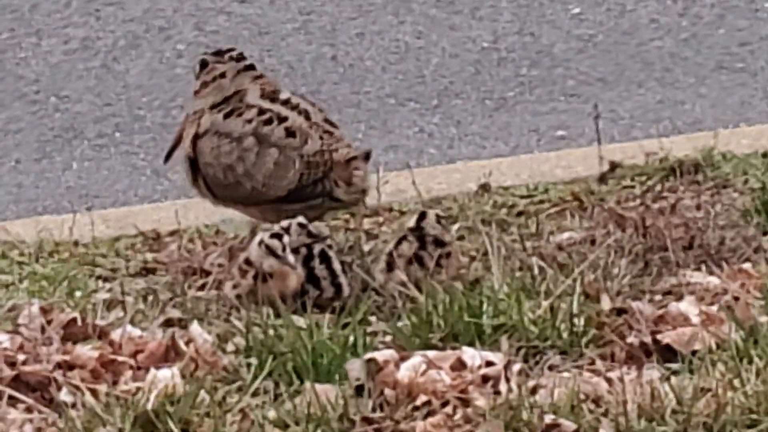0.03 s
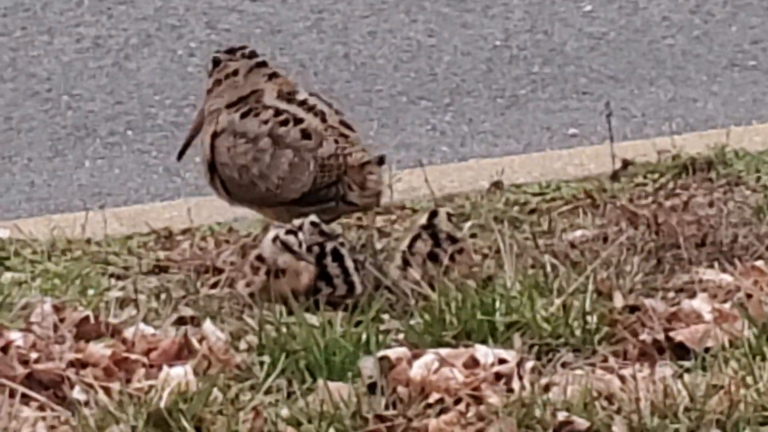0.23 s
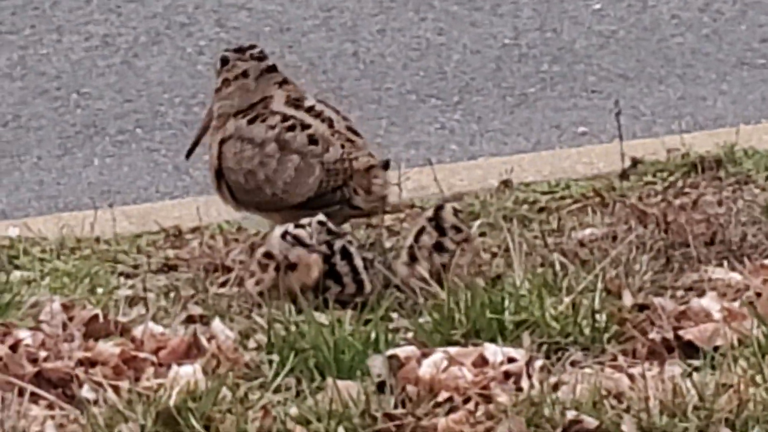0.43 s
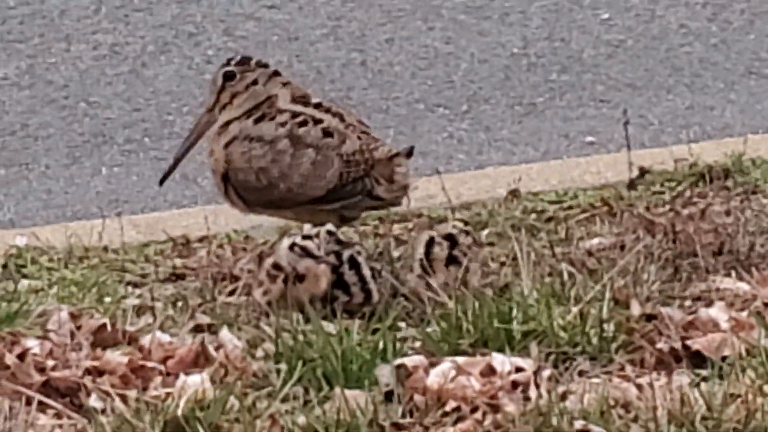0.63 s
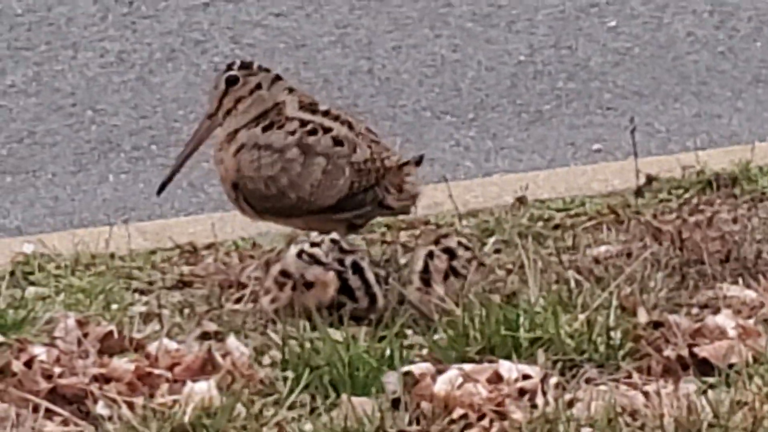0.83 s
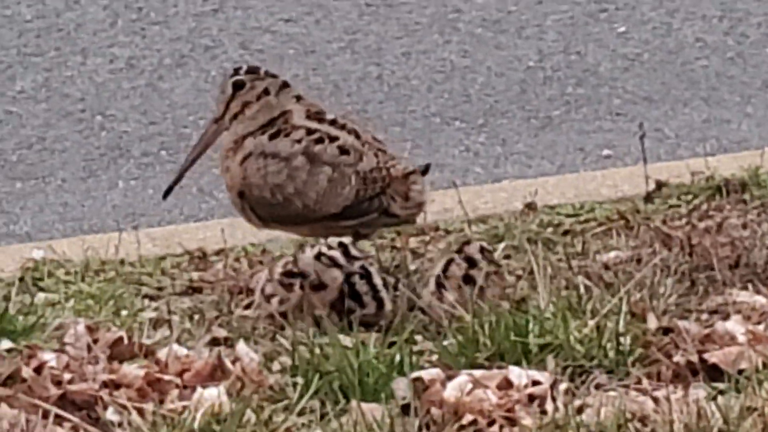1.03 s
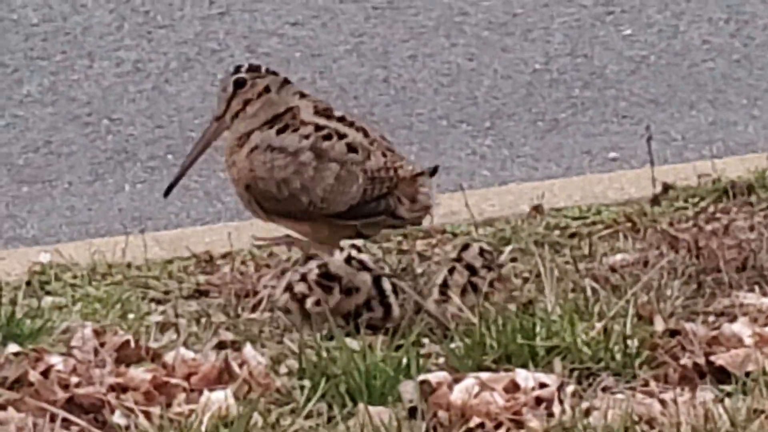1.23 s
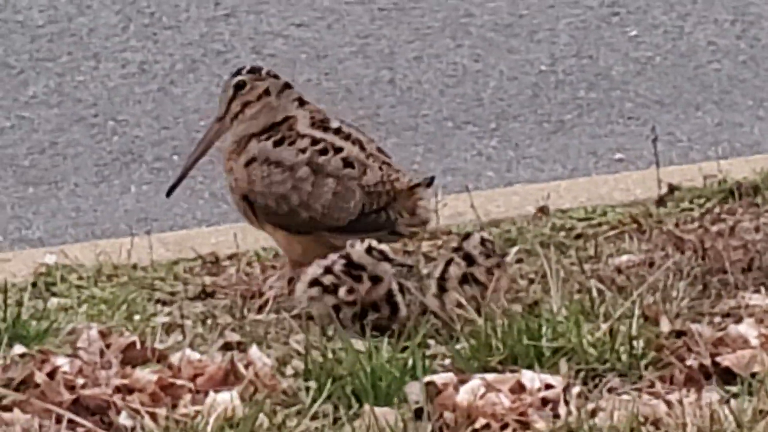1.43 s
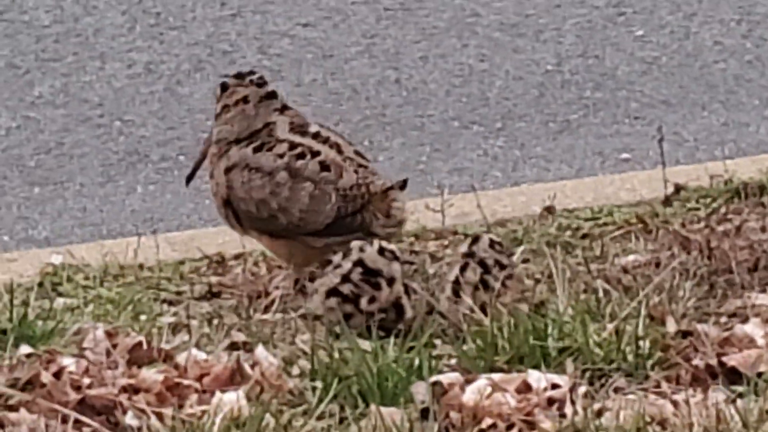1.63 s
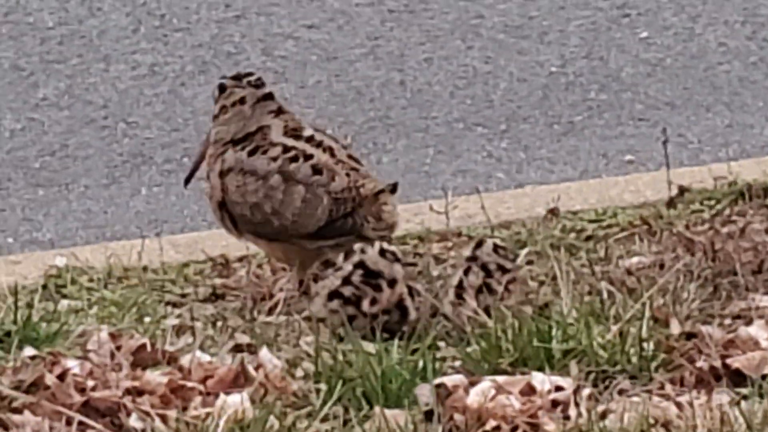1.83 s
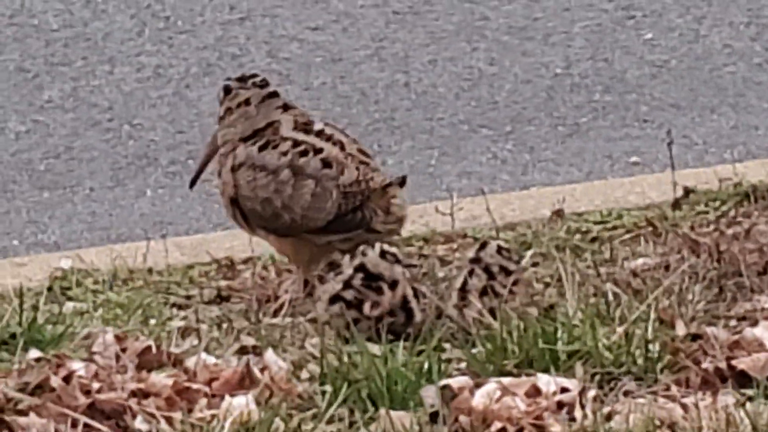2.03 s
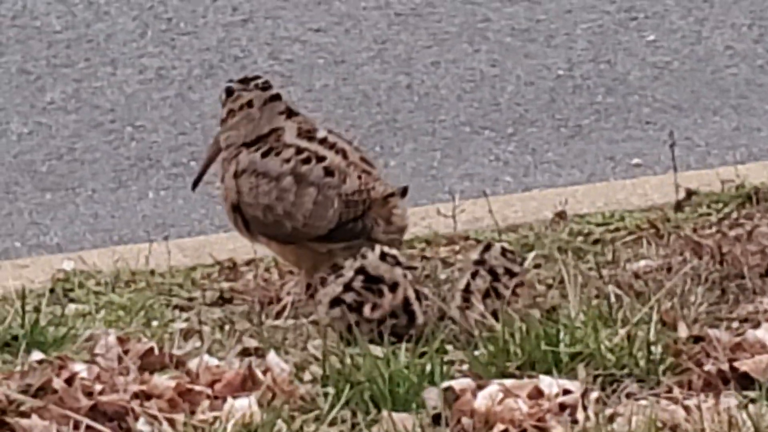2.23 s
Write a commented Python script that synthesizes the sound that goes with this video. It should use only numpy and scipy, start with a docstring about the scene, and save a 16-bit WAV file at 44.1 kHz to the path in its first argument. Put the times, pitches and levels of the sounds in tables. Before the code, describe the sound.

Thin, high peeps from woodcock chicks overlap and slide downward during the first 0.6 seconds. Dry leaves rustle briefly around 0.5 seconds. From 0.7 to 0.9 seconds a bird gives four quick, soft nasal notes. Wind thumps the microphone, mostly on the left, strongest from 0.3 to 1.1 seconds, then eases. Faint stalk crackles, grass hiss and steady distant traffic continue to the end at about 2.3 seconds.

```python
"""A grassy roadside with a woodcock and her chicks. Thin, high peeps slide downward and overlap,
and a bird adds four soft nasal notes, shaped by its throat. The calls echo off trees and ground.
A gust thumps mostly on the left microphone opening and stirs dry leaves and stalks.
Behind it all, grass hisses and distant traffic rushes steadily."""
import sys
import numpy as np
from scipy import signal
from scipy.fft import rfft, irfft, next_fast_len
from scipy.io import wavfile
from scipy.ndimage import uniform_filter1d, map_coordinates

SR = 44100
rng = np.random.default_rng(int(sys.argv[2]) if len(sys.argv) > 2 else 0)


def wav_out(sig):
    """Save sig, one row per channel (or a flat mono array), as 16-bit PCM at SR to the path in sys.argv[1]."""
    wavfile.write(sys.argv[1], SR, np.round(np.clip(np.atleast_2d(sig).T, -1, 1) * 32767).astype(np.int16))


N = 101429

# The near peep. Each row: time in seconds, pitch in Hz, level in dB, pan in dB (plus is left).
NEAR_PEEP = [(.174, 6230, -67, -1), (.194, 7290, -63, -6), (.212, 7600, -57.5, -12), (.252, 7200, -61, -12),
             (.29, 7170, -67, -15), (.35, 6920, -68, 8), (.39, 6670, -59, 13), (.418, 6840, -66, 9),
             (.46, 6710, -59, 10), (.49, 6500, -70, 1), (.525, 6460, -67, 3), (.568, 6530, -64, -1),
             (.596, 6080, -77, -7)]
# Farther peeps, one list each. Each row: time in seconds, pitch in Hz, level in dB.
DISTANT_PEEPS = [
    [(0, 6660, -76), (.11, 6390, -75), (.18, 6330, -75), (.225, 6070, -75), (.248, 5600, -80)],
    [(.298, 5710, -77), (.325, 6750, -72), (.345, 6840, -70), (.41, 6570, -67.5), (.48, 6270, -67),
     (.52, 6210, -66), (.567, 6220, -66), (.604, 5760, -74)],
]
# Nasal notes, one list each. Each row: time in seconds, pitch in Hz, level in dB.
NASAL_NOTES = [
    [(.715, 476.7, -60), (.727, 505, -49.5), (.738, 513, -47.5), (.745, 460, -53.5), (.757, 450, -57)],
    [(.753, 449.5, -58), (.771, 448.6, -52), (.791, 434, -63)],
    [(.799, 444, -63), (.813, 461.5, -52.5), (.822, 464, -63), (.836, 463, -56)],
    [(.855, 494.5, -56), (.867, 464, -51), (.876, 456, -53), (.89, 430, -65)],
]
# Swirls of air. Each row: middle in seconds, strength in dB, pitch in Hz, pan in dB.
WIND_EDDIES = [(.008, -31, 60, 31), (.089, -24, 52, 29), (0.163, -27.5, 52, 18), (0.244, -26, 63.3, 26),
               (0.342, -12.5, 71.5, 38), (0.388, -26.5, 62, 21), (0.433, -22, 66.4, 19),
               (.486, -23.5, 63, -31), (0.531, -23, 59.1, 24), (.558, -28.5, 195, 30), (0.572, -13, 76, 32),
               (0.619, -19.5, 76, 24), (0.664, -17.5, 65, 20), (.698, -17, 60, 10), (.733, -16.5, 85, 27),
               (.762, -17.5, 83, 26), (0.871, -18, 92, 28), (0.894, -22, 64.5, 24), (.974, -21, 89.4, 26),
               (1.0, -24, 75, 24), (1.05, -41, 70, 2), (1.097, -24, 61.6, 27), (1.191, -37, 69, 12),
               (1.455, -30, 71, 18), (1.683, -38.5, 81, 1)]
# Brushes through dry leaves. Each row: start in seconds, level in dB, seconds to fade by 60 dB.
LEAF_BRUSHES = [(0.44, -46.5, 0.36), (.5, -63.5, 0.77), (1.546, -65, .2)]
# Stalk crinkles. Each row: start in seconds, level in dB, pan in dB, seconds to fade by 60 dB.
CRINKLES = [(.615, -61, 3, .03), (.675, -57, -2, .04), (.778, -53.5, -3, 0.015), (1.108, -63.5, 2, .09),
            (1.32, -66, 0, 0.18), (1.48, -58, -3, 0.023), (1.548, -58.5, 0, 0.089), (1.968, -68, 0, 0.14),
            (2.272, -63, -2, 0.077)]

# How each noise swells and sinks. Each row: time in seconds, base level in dB.
WIND_SWELL = [(0, -43), (.2, -43), (.4, -39), (.6, -35), (.72, -34.5), (.82, -39), (1.0, -41.5),
              (1.15, -45.5), (1.3, -54), (1.6, -51), (1.9, -59), (2.1, -61.5), (2.3, -50)]
GRASS_SWELL = [(0, -56.5), (.06, -72), (.19, -62), (.25, -65), (.42, -62), (.65, -61), (.86, -59.5),
               (1.03, -62.5), (1.33, -63), (1.42, -63), (1.58, -62), (1.75, -62.5), (1.98, -61),
               (2.15, -63), (2.3, -62)]
TRAFFIC_SWELL = [(0, -49), (.25, -49.5), (.45, -46), (.7, -48), (.9, -47), (1.15, -50), (1.6, -50.5),
                 (1.8, -51), (2.3, -49.5)]
# The tone colour of each source. Each row: frequency in Hz, relative strength in dB.
THROAT_COLOUR = [(500, -36), (1000, -9), (1400, 0.5), (1650, -6), (1950, 5), (2350, -7.5), (2700, -5),
                 (3150, 1.5), (3600, -2.5), (4100, -13.5), (4700, -16), (5300, -27), (6300, -10),
                 (7200, -25), (9000, -38), (14000, -60)]
WIND_COLOUR = [(20, -17), (32, -9.5), (48, -2), (70, -2.5), (100, -7.5), (140, -11.5), (220, -20),
               (350, -37.5), (800, -38), (3000, -67.5)]
LEAF_COLOUR = [(300, -1), (700, 2), (1400, 5.5), (2100, -0.5), (2800, 6), (3500, -1.5), (4800, -8),
               (5800, -7), (8200, -12.5), (11000, -27), (14000, -18), (16000, -19)]
STALK_COLOUR = [(1000, -12), (4000, 0.5), (7000, 6.5), (11000, -2.5), (16000, -3)]
GRASS_COLOUR = [(500, -19), (2000, 9.5), (3300, 6), (5200, 1.5), (6300, 5), (7100, 5.5), (7800, -2),
                (9500, -5), (15500, -6)]
TRAFFIC_COLOUR = [(18, -35), (30, -4.5), (71, -0.5), (97, -6), (133, -13), (177, -13), (277, -16),
                  (350, -16), (379, -16.5), (492, -16), (728, -17.5), (787, -22), (1360, -19.5),
                  (2830, -37), (6890, -34), (15500, -38)]
# How air and microphone dull the traffic. Each row: frequency in Hz, gain in dB.
TRAFFIC_DULLING = [(50, 1.5), (130, 2), (300, 1), (1500, 3), (3000, 1.5), (6000, -9.5), (12000, -24)]
# How alike left and right are. Each row: frequency in Hz, likeness from 0 (unrelated) to 1 (same).
GRASS_LIKENESS = [(2000, 0.14), (6000, 0), (10000, 0)]
TRAFFIC_LIKENESS = [(60, 0.94), (280, 1), (600, 0.41), (1200, .05), (2500, 0.006), (5000, 0.022),
                    (12000, 0)]
# Which side is louder. Each row: frequency in Hz, pan in dB.
GRASS_BALANCE = [(3000, -1.5), (5000, 0.5), (6800, 2.5), (9000, -3.5), (14000, 2)]
TRAFFIC_BALANCE = [(100, 1.5), (500, 0), (1300, 3.5), (2500, 1.5), (4500, 2.5), (6500, 5), (10000, 6)]


def peep(rows, waver_hz=14, flutter_db=1, octave_db=-32):
    """A nearly pure whistle that wavers slightly in pitch and loudness."""
    hz, db = curves(rows)[:2]
    pitch = uniform_filter1d(hz, size=500) + waver_hz * wobble(129.8)
    phase = 2 * np.pi * np.cumsum(pitch) / SR
    tone = np.sin(phase) + amp(octave_db) * np.sin(2 * phase)
    return np.sqrt(2) * gate(rows) * amp(db + flutter_db * wobble(68)) * tone


def peeps(far_pan_db=-3, far_echo_db=-5):
    """One near whistle, and two farther ones to the right with extra echo."""
    far = sum(peep(rows) for rows in DISTANT_PEEPS) * panned(far_pan_db)
    near_pan_db = curves(NEAR_PEEP)[2]
    return peep(NEAR_PEEP) * panned(near_pan_db) + far + amp(far_echo_db) * echo(far)


def nasal_notes(pitch_jitter=0.0072, roughness=0.25):
    """A stack of overtones shaped by the bird's throat, with a puff of noise on each vibration."""
    out = np.zeros(N)
    harmonics = np.arange(1, 21)[:, None]
    rasp = noise(THROAT_COLOUR)[0]
    for rows in NASAL_NOTES:
        hz, db = curves(rows)
        loudness = gate(rows) * amp(db)
        on = loudness > 0
        hz = (hz * (1 + pitch_jitter * wobble(300)))[on]
        phase = 2 * np.pi * np.cumsum(hz) / SR
        offsets = rng.uniform(0, np.pi, harmonics.shape)
        strengths = amp(along(THROAT_COLOUR, harmonics * hz))
        tone = np.sum(strengths * np.sin(harmonics * phase + offsets), axis=0)
        puffs = roughness * rasp[on] * (1 + np.cos(phase))
        out[on] += loudness[on] * (unit(tone) + puffs)
    return out * panned(db=6.5)


def wind(uneven_db=3.5, sheltered_right_db=-10.5, width_cycles=0.62, rise_to_fall=0.66):
    """Air rumbles on the microphone openings, and single swirls thump for a cycle or two."""
    level_db, = curves(WIND_SWELL)
    lumps_db = uneven_db * np.array([wobble(17.94), wobble(18.9)])
    out = noise(WIND_COLOUR) * amp(level_db + lumps_db) * amp([[0], [sheltered_right_db]])
    for middle, db, hz, pan in WIND_EDDIES:
        cycles = (clock() - middle) * hz
        width = width_cycles * np.where(cycles < 0, rise_to_fall, 1)
        swell = amp(db) * np.exp(-.5 * (cycles / width) ** 2)
        out += swell * np.sin(2 * np.pi * cycles) * panned(pan) / np.sqrt(2)
    return out


def leaves(grain_db=0.5):
    """Dry leaves brush together: grainy noise that swells quickly, holds and dies away."""
    loudness = sum(burst(start, db, fade_s, rise_s=0.0097, fade_after_s=0.017)
                   for start, db, fade_s in LEAF_BRUSHES)
    return loudness * unit(noise(LEAF_COLOUR) * amp(grain_db * wobble(500)))


def stalks(crackles_per_s=60, faintest_db=-73, crackle_fade_s=0.0091, rise_share=.08):
    """Dry stalks give many faint, random crackles and a few soft crinkles."""
    clicks = np.zeros((2, N))
    for when, size, side in rng.random((int(crackles_per_s * N / SR), 3)):
        sample = min(int(when * N), N - 1)
        clicks[:, sample] += amp(faintest_db + 8 * size) * panned(8 * (side - .5))[:, 0]
    decay = amp(-60 * clock()[:SR // 10] / crackle_fade_s)
    loudness = signal.fftconvolve(clicks, decay[None], axes=1)[:, :N]
    for start, db, pan, fade_s in CRINKLES:
        rise_s = rise_share * fade_s
        loudness += burst(start, db, fade_s, rise_s, fade_after_s=rise_s) * panned(pan)
    return loudness * noise(STALK_COLOUR)


def grass():
    """A fine hiss of grass that swells with the breeze."""
    level_db, = curves(GRASS_SWELL)
    hiss = rush(GRASS_COLOUR, GRASS_LIKENESS, GRASS_BALANCE)
    return hiss * amp(level_db + 0.35 * wobble(24.95) + 0.98 * wobble(400))


def traffic():
    """The wide rush of far roads, dulled by the air and the microphone."""
    level_db, = curves(TRAFFIC_SWELL)
    roads = rush(TRAFFIC_COLOUR, TRAFFIC_LIKENESS, TRAFFIC_BALANCE)
    dulled = filtered(roads, lambda hz: amp(along(TRAFFIC_DULLING, hz)))
    return dulled * amp(level_db + 0.13 * wobble(9.6))


def echo(x, fade_s=0.24):
    """Trees and ground answer a sound with a short, fading tail."""
    t = clock()[:SR // 2]
    tail = rng.standard_normal((2, len(t))) * amp(-60 * t / fade_s)
    return signal.fftconvolve(x, tail / np.linalg.norm(tail[0]), axes=1)[:, :N]


def amp(db):
    """Turn decibels into a number to multiply by."""
    return 10 ** (np.asarray(db) / 20)


def unit(x):
    """Scale a sound to an average power of 1."""
    return x / np.sqrt(np.mean(x ** 2) + 1e-20)


def along(points, hz):
    """Read between a table's rows, with frequency spaced by octaves."""
    frequencies, values = np.transpose(points)
    return np.interp(np.log(hz + 1), np.log(frequencies + 1), values)


def clock():
    """The time of every sample in seconds."""
    return np.arange(N) / SR


def curves(rows):
    """One value per sample for each column after the time."""
    times, *columns = np.transpose(rows)
    return [np.interp(clock(), times, column) for column in columns]


def wobble(rate):
    """A smooth curve through `rate` random values a second."""
    return map_coordinates(rng.standard_normal(int(N * rate / SR) + 4), [clock() * rate])


def panned(db):
    """Left and right gains, `db` apart, that keep the total power."""
    gains = amp(np.array([[.5], [-.5]]) * db)
    return gains / np.sqrt(np.mean(gains ** 2, axis=0))


def filtered(x, response):
    """Turn each frequency up or down by response(hz)."""
    size = next_fast_len(N + SR // 2)
    return irfft(rfft(x, size) * response(np.fft.rfftfreq(size, 1 / SR)), size)[..., :N]


def noise(colour):
    """Noise of a given tone colour, unrelated left and right."""
    return unit(filtered(rng.standard_normal((2, N)), lambda hz: amp(along(colour, hz))))


def rush(colour, likeness, balance):
    """Stereo noise with a given likeness and balance of the sides."""
    def shares(hz):
        angle = np.arccos(np.clip(along(likeness, hz), -1, 1)) / 2
        return np.array([np.cos(angle), np.sin(angle)])
    common, opposite = filtered(noise(colour), shares)
    stereo = np.array([common + opposite, common - opposite])
    return unit(filtered(stereo, lambda hz: panned(along(balance, hz))))


def gate(rows, fade_s=0.0052):
    """Fade a call in at its first row and out at its last."""
    t = clock()
    return np.clip(np.minimum(t - rows[0][0], rows[-1][0] - t) / fade_s, 0, 1)


def burst(start, db, fade_s, rise_s, fade_after_s):
    """A loudness curve that rises, then drops 60 dB every fade_s seconds."""
    age = clock() - start
    return np.clip(age / rise_s, 0, 1) * amp(db - 60 * np.maximum(age - fade_after_s, 0) / fade_s)


def scene():
    """Birds and their echo over wind, traffic and dry plants."""
    whistles, notes = peeps(), nasal_notes()
    answer = echo(amp(db=-11) * whistles + amp(db=-10) * notes)
    return whistles + notes + answer + wind() + traffic() + grass() + leaves() + stalks()


def record(dry, low_cut_hz=35.5, top_hz=15750):
    """The microphone softens the deepest rumble and drops the highest treble."""
    low_cut = lambda hz: 1 - 1 / (1 + (hz / low_cut_hz) ** 6)
    return filtered(dry, lambda hz: low_cut(hz) * (hz < top_hz))


dry = scene()
out = record(dry)
wav_out(out)
```